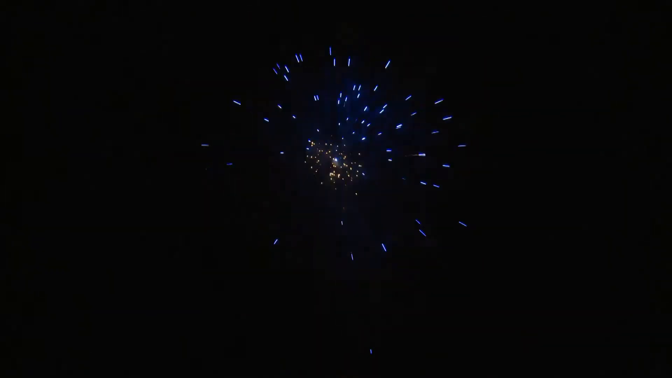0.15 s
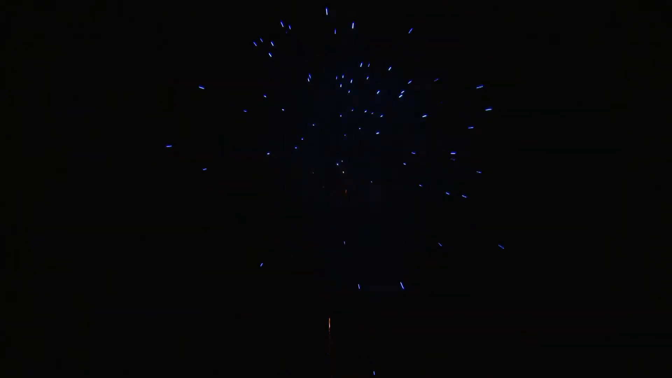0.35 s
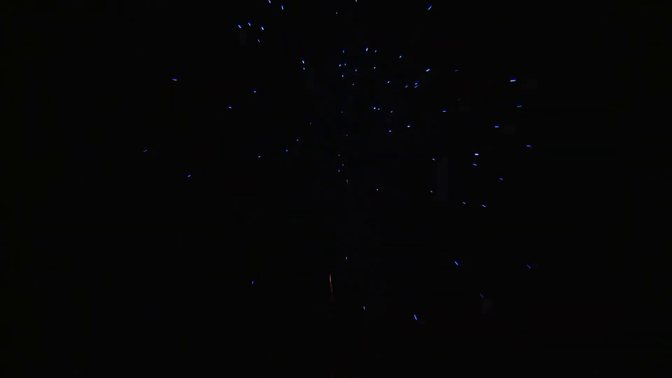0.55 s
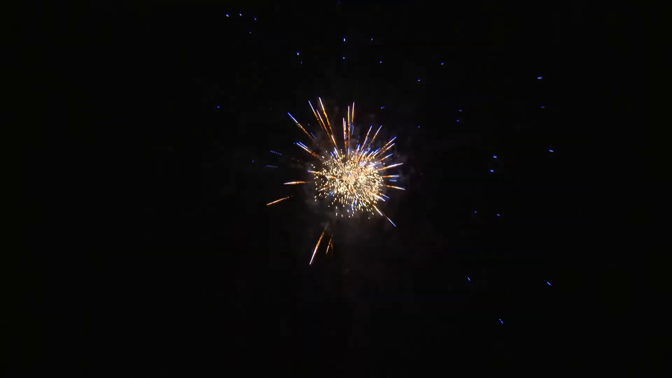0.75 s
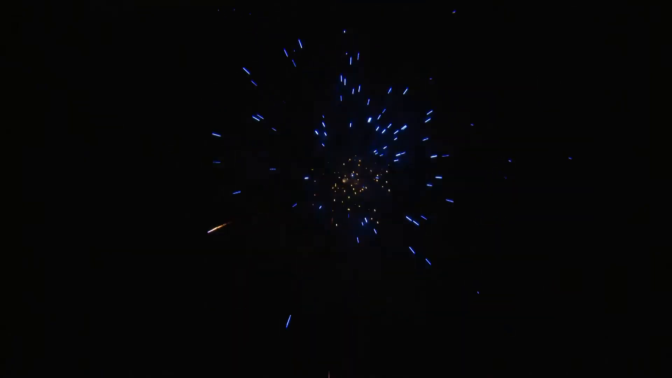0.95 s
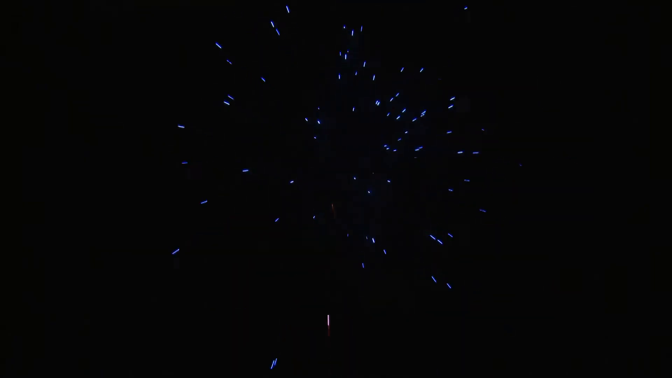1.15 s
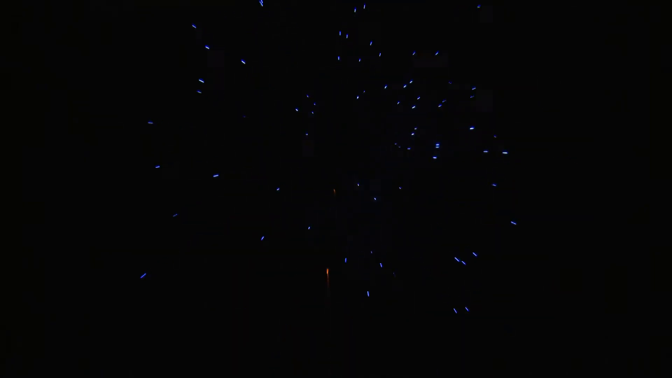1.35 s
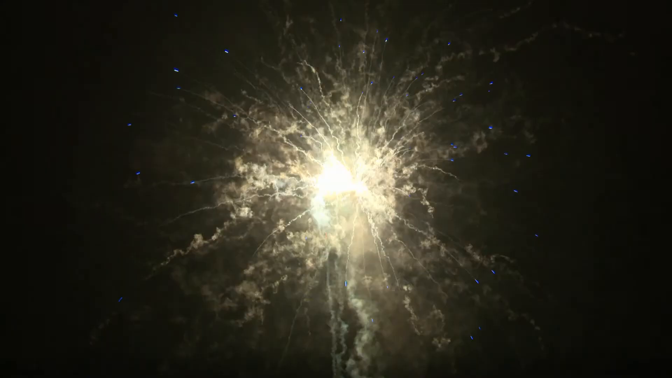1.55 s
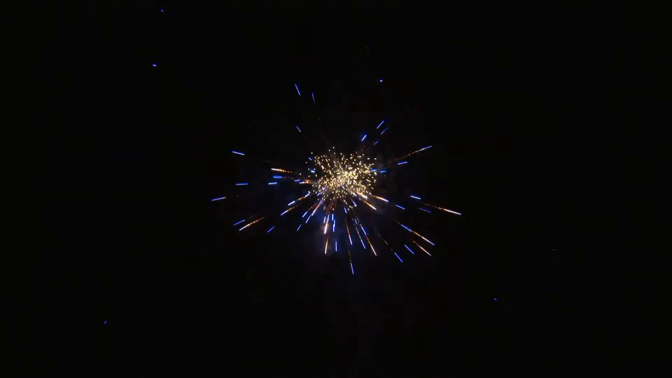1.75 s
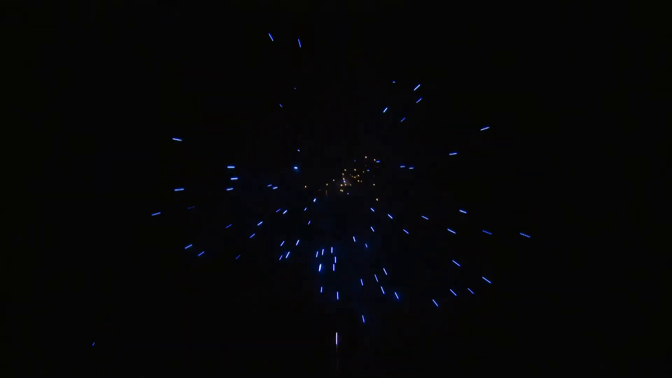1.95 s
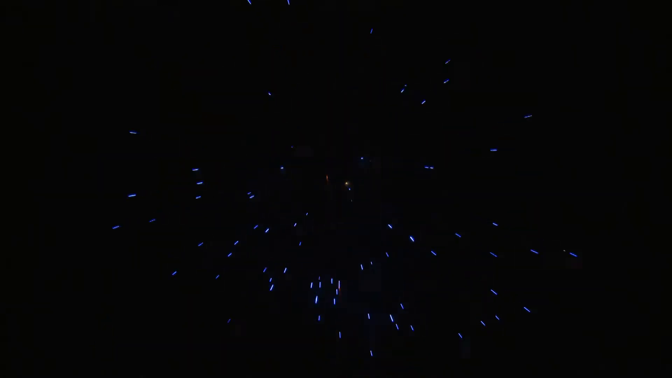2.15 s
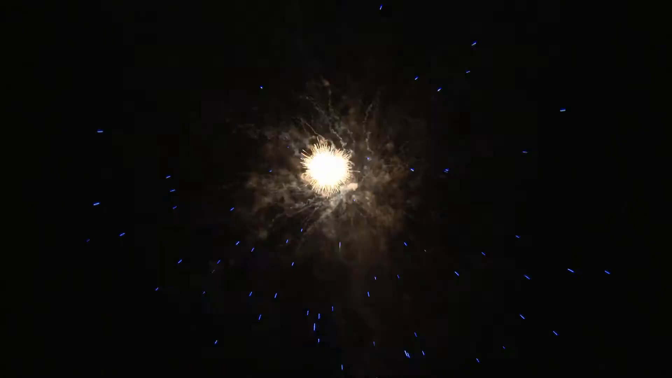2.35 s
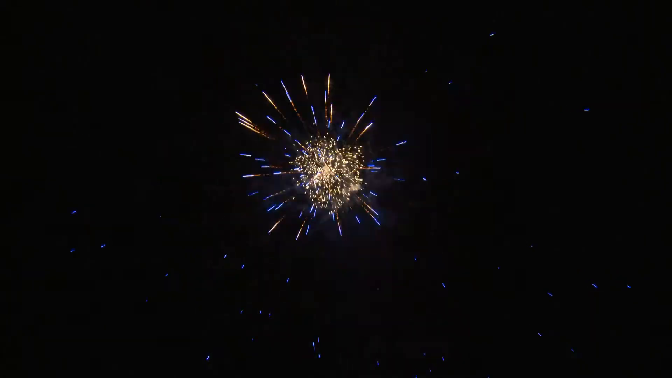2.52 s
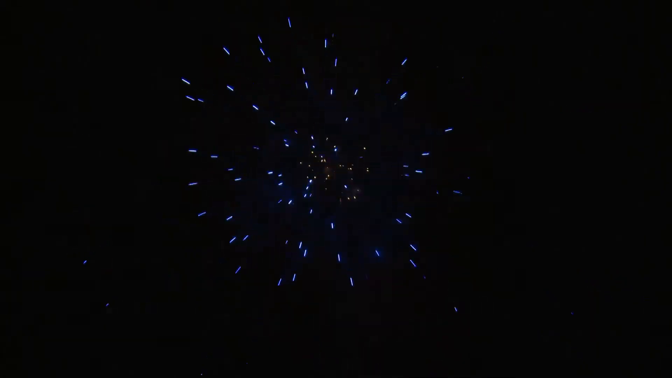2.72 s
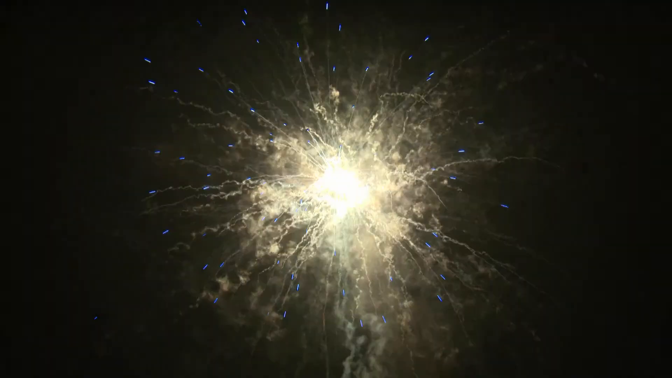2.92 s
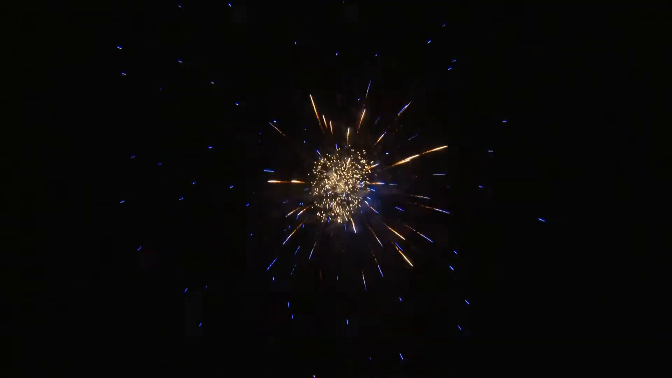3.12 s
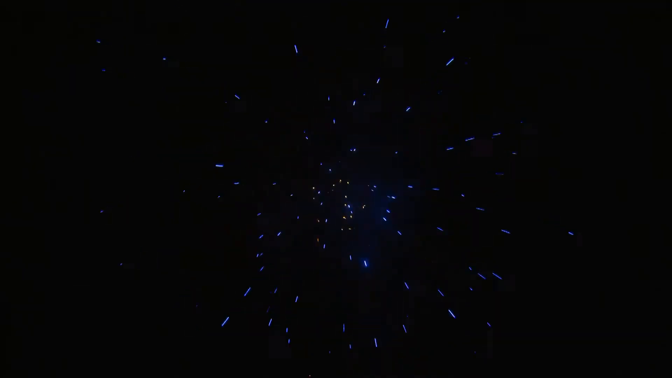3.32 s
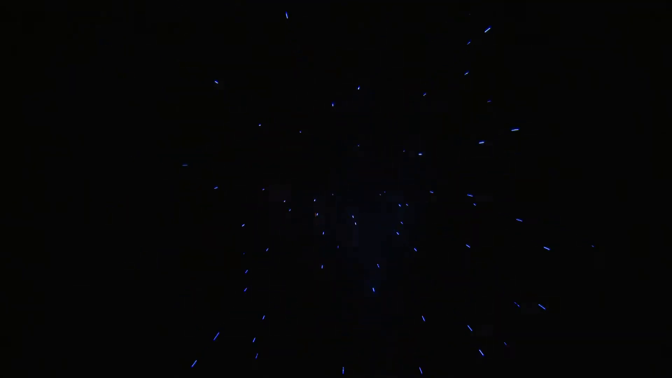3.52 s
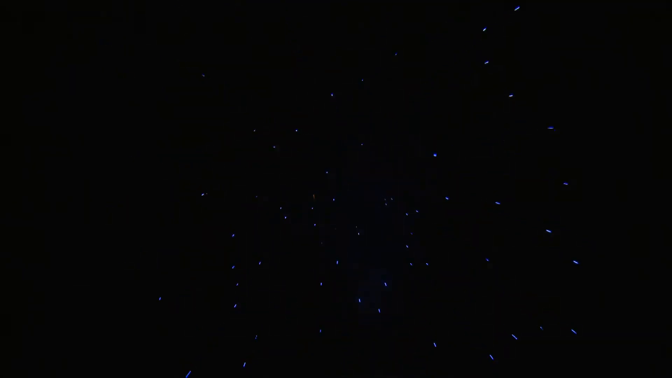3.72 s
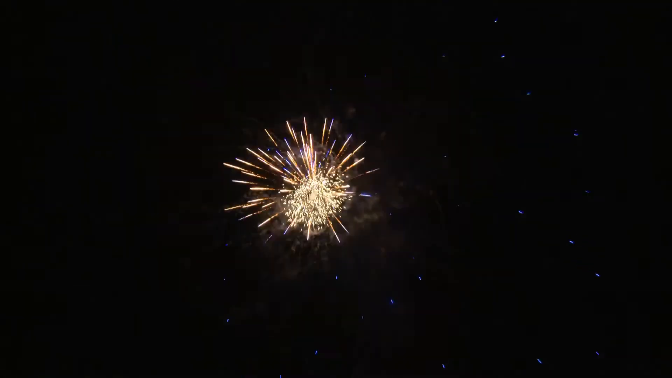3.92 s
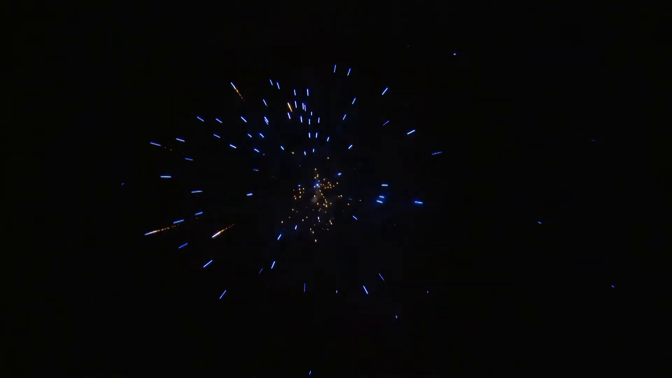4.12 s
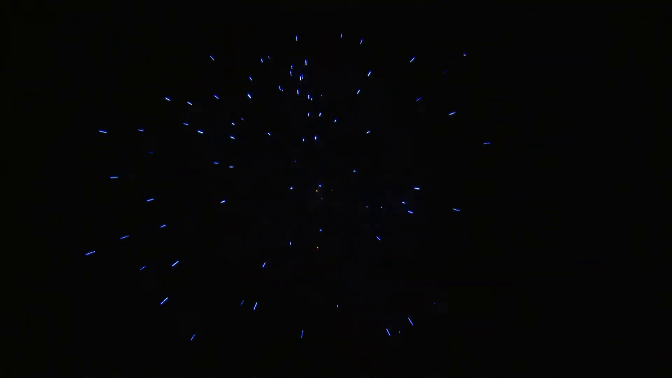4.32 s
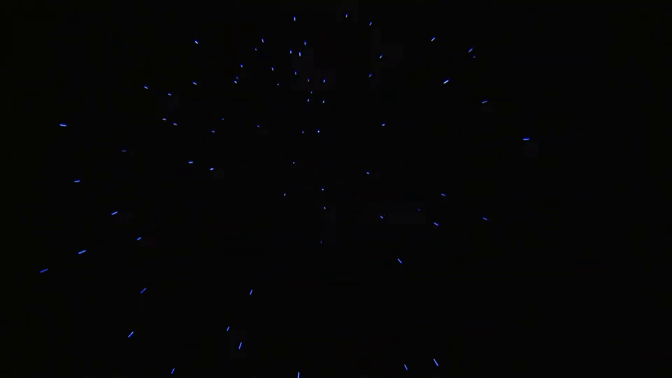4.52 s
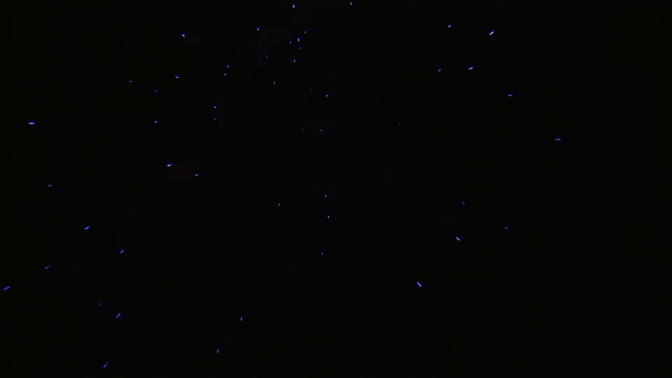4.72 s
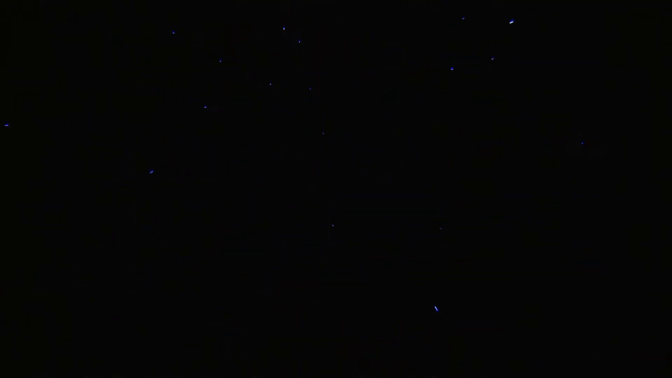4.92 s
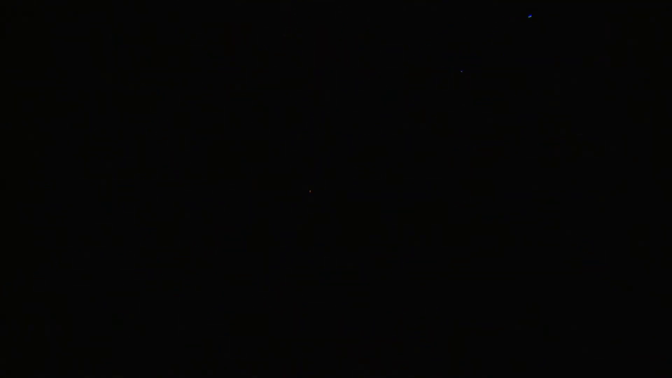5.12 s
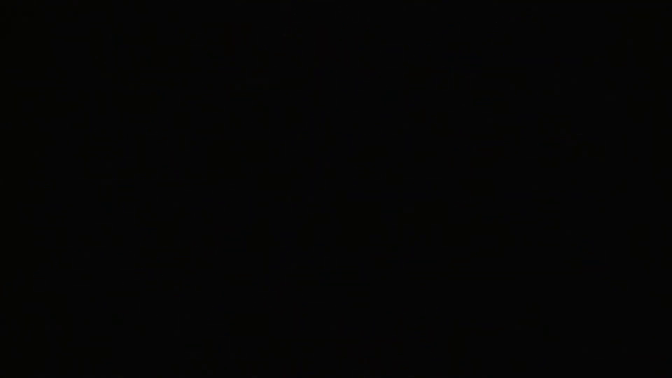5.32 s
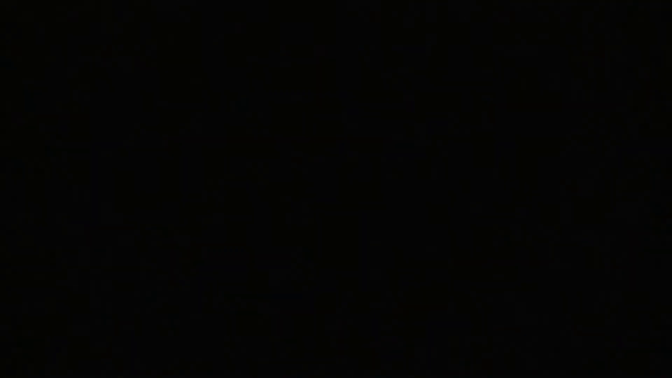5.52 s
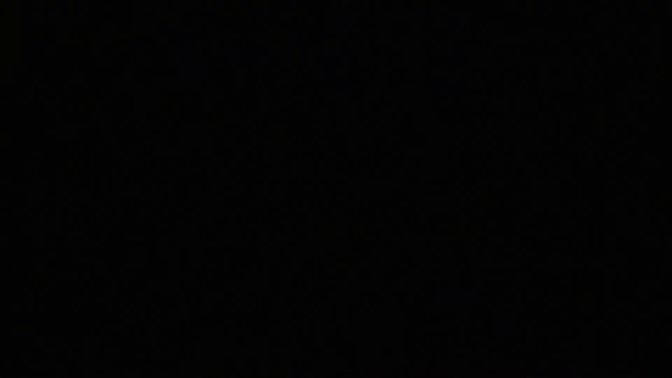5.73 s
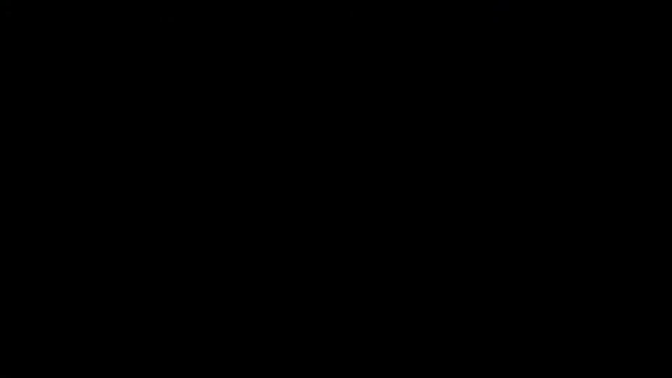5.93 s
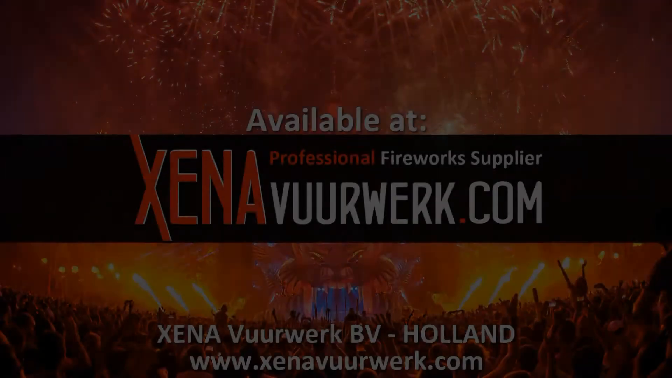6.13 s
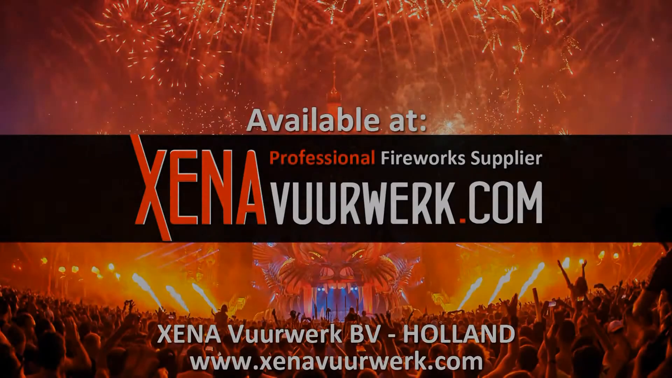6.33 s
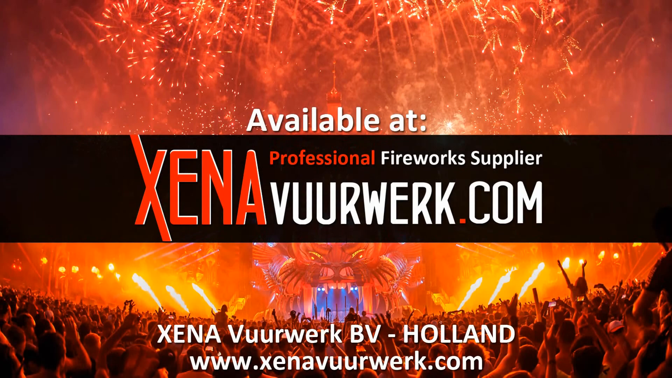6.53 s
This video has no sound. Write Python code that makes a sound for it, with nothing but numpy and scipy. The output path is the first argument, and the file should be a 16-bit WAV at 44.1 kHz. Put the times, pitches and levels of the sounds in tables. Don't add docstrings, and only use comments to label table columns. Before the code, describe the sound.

Rumble from earlier shots is already rolling when a sharp firework bang hits almost at once. Five more follow, under a second apart, slightly quickening for the fifth. Duller launch thumps precede some of them. Every bang is dry and short up close, overloading the nearby microphone, then answered by scattered slaps, low knocks and a lumpy rumble across open land. The last echoes die away and are faded out.

```python
import sys
import numpy as np
from scipy import signal
from scipy.io import wavfile
from scipy.ndimage import map_coordinates

SR = 44100
rng = np.random.default_rng(int(sys.argv[2]) if len(sys.argv) > 2 else 0)


def unload_audio(sound):
    columns = np.transpose(np.atleast_2d(sound))
    steps = np.round(np.clip(columns, -1, 1) * 32767)
    wavfile.write(sys.argv[1], SR, steps.astype(np.int16))


def ratio(d):
    e = np.asarray(d, float) / 20
    return 10 ** e


N = 289737

# start in seconds, peak in dB, lag of the right port in ms,
# gain of the right port during the shock in dB, tail in dB.
BURSTS = [
    (0.1038, -2.6, 0.47, -28, 4.45),
    (0.8826, .1, 0.24, -2, 1.8),
    (1.7998, 0.9, 0.21, -3.5, 1.7),
    (2.586, -0.36, 0.34, -1.2, 3.26),
    (3.185, -0.4, .4, -3.5, 3.3),
    (4.031, -1.8, 0.43, -3.5, 3.8),
]
# start in seconds, peak in dB, spit of gas in dB.
LIFTS = [
    (0.706, -13, -4.5),
    (1.559, -13, -1.5),
    (2.429, -12.5, -2),
]
# delay in ms, size, swing in Hz, T60 in ms.
BURST_PATHS = [(0, -.45, 260, 26), (3, 5, 166, 13), (4, -.4, 55, 70), (7.6, -1.2, 185, 22),
               (9.8, .35, 420, 30), (11.8, .65, 260, 17), (16.2, .2, 330, 20), (27.4, .2, 230, 50)]
# delay in ms, size, swing in Hz, T60 in ms.
LIFT_PATHS = [(0, .24, 200, 20), (1.5, -.1, 75, 50), (3.9, -.42, 190, 18), (6.9, .5, 165, 19),
              (15.5, -.2, 260, 26), (21.5, .05, 150, 90)]
# delay in seconds, strength in dB.
ROLL = [(.05, -13), (.18, 0.5), (.45, -1.9), (.7, -4), (.95, -8), (1.02, 3), (1.3, -0.5), (1.7, -5.5),
        (2.7, -13)]
# frequency in Hz, density in dB per Hz.
RUMBLE = [(15, -33), (25, -11), (59, -5), (87, -1.5), (135, 11), (260, -21), (340, -38), (570, -120)]
BODY = [(150, -29), (260, 2.5), (382, -5.5), (443, -1.5), (657, -5), (876, -11), (1190, -4.5),
        (1550, -14.5), (1800, -23.5), (2300, -33.5), (3000, -84)]
HISS = [(1240, -32), (2100, -4.5), (3580, -5.5), (5400, -9), (6000, -15), (14500, -27), (15300, -53)]
# frequency in Hz, density in dB per Hz.
CRACK = [(410, -35.5), (700, 6.5), (1960, -13.5), (3380, -26.5), (3700, -13), (5360, -25), (7660, -22),
         (14600, -30), (16500, -44.5)]
SCATTER = [(24, -30.5), (40, -6.5), (141, 6.5), (547, -4), (882, -17), (1390, -13), (1700, -27.5),
           (3260, -33), (4400, -27), (6590, -33), (8910, -38), (12000, -44.5), (15700, -47), (16000, -79)]
# frequency in Hz, density in dB per Hz.
SPIT = [(290, -33), (500, -10), (1520, -12.5), (2040, -18.5), (5430, -16.5), (10300, -24), (14900, -47),
        (16500, -53)]
# frequency in Hz, T60 in seconds.
NEAR_T60 = [(60, 0.39), (160, 0.075), (420, 0.21), (800, 0.18), (1300, 0.2), (3000, 0.14), (8000, 0.18),
            (12000, 0.21), (16000, .13)]
FAR_T60 = [(60, 1), (300, 0.64), (1100, 0.42), (3000, 0.59), (6000, 0.52), (9000, 0.74), (12000, 0.31),
           (16000, .4)]
# frequency in Hz, level in dB.
FAR_DB = [(60, -20.5), (300, -21), (1100, -17), (4000, -16), (10000, -17), (16000, -8.5)]
# frequency in Hz, level in dB.
SIDE_DB = [(60, -30.5), (300, -12.5), (700, -24), (1200, -39.5), (3000, -28.5), (8000, -35)]
FADE = (5.28, 6.073)
# frequency in Hz, density in dB per Hz.
GLINT = [(1240, -35.5), (2100, 0), (2360, -8.5), (3760, -7), (4910, -3), (5890, -12), (10000, -25.5),
         (13000, -59), (22000, -120)]
# start in seconds, peak in dB, lowest frequency in Hz, length in seconds.
TICKS = [
    (4.443, -69, 5950, 0.0035),
    (4.571, -78, 9000, .004),
    (4.62, -74, 8500, .004),
    (4.731, -78, 6500, 0.0038),
    (5.324, -81, 5000, 0.026),
    (5.813, -73, 5000, 0.019),
]
# frequency in Hz, density in dB per Hz.
SELF_NOISE = [(200, -4), (14800, -2.5), (15200, -42)]
# frequency in Hz, density in dB per Hz.
RATTLE = [(410, -28.5), (700, 0.5), (898, -3), (1480, -3.5), (1970, -13), (3890, -18.5), (7590, -25),
          (8760, -26.5), (16000, -38.5)]
# extra delay in ms, echo in dB, boom in dB, roll in dB.
SHELL_PLACES = [
    (-0.5, -2.5, 1.5, -0.3),
    (2.5, -0.7, -0.6, 0.94),
    (2, -1.4, 2.3, -1),
    (1, -1.4, 1.9, 0.46),
    (3, -0.9, 1.2, -1),
    (3, -0.9, 1, -0.1),
]
# start in seconds, roll in dB.
EARLIER = [
    (-1.9, 6.54),
    (-1.55, 3.6),
]
# delay after a burst in seconds, slap peak in dB, boom, hiss and edge in dB.
WALLS = [
    (.370, -26.5, -23, -33, -28),
    (.515, -21.5, -1.5, -35, -6.5),
    (.604, -23, -12.5, -33.5, -6.5),
    (.830, -42, -3.5, -21, -9),
    (.994, -40, -3, -31, 4),
    (1.298, -40.5, -7.5, -34.5, 1),
    (1.349, -42, -12.5, -32.5, -9),
]
# delay after a burst in seconds, peak in dB, pitch in Hz, T60 in seconds.
OBJECTS = [
    (.388, -23, 72.5, 0.053),
    (.616, -30, 119, .065),
    (.791, -25.5, 99.1, .075),
    (1.083, -36, 1370, 0.017),
    (2.0945, -22.5, 1305, 0.012),
]
# level in dB, loss in the air in dB per second, lumps in dB,
# share of the swings followed.
ROLL_LAYERS = [
    (-45, 2.25, 2, .9),
    (-52.5, 1, 2.43, 1),
    (-70.5, 4, 0.7, 0.78),
]
# delay in ms, size, swing in Hz, T60 in ms.
EDGE = [(4.2, -0.92, 982, 16), (5.6, 0.8, 621, 16)]


def along(points, hz):
    f, v = np.transpose(points)
    return np.interp(np.log(hz + 1), np.log(f + 1), v)


def ramp(t, start, length):
    return np.clip((t - start) / length, 0, 1)


def coloured(spectrum, size, decay=lambda hz, t: 0 * t, wide_db=0):
    hz, t, z = signal.stft(rng.standard_normal((2, size + 1024)), SR, nperseg=512)
    gain = ratio(along(spectrum, hz))[:, None]
    z = z * gain / np.sqrt(np.mean(gain ** 2))
    z = z * ratio(decay(hz[:, None], t))
    z[1] *= np.minimum(ratio(along(SIDE_DB, hz) + wide_db), 1)[:, None]
    mid, side = signal.istft(z, SR, nperseg=512)[1][:, :size]
    return np.array([mid + side, mid - side])


def swings(paths, t, lead, front_ms, blur=0):
    wave = 0 * t
    for delay_ms, size, hz, t60_ms in paths:
        rise_ms = front_ms + blur * max(delay_ms - 3, 0)
        since = np.maximum(t - delay_ms / 1000, 0)
        front = 1 - np.exp(-since * 1000 / rise_ms)
        swing = np.cos(2 * np.pi * hz * since + lead)
        wave = wave + size * front * swing * ratio(-60000 * since / t60_ms)
    return wave


def add(out, s, sound):
    start = round(s * SR)
    out[:, start:start + sound.shape[1]] += sound[:, :out.shape[1] - start]


def returns(reflectors):
    arrivals = []
    for burst, (late_ms, echo_db, boom_db, _) in zip(BURSTS, SHELL_PLACES):
        for delay, *rest in reflectors:
            if burst[0] + delay < N / SR:
                arrivals.append((burst[0] + late_ms / 1000 + delay, echo_db, boom_db, rest))
    return arrivals


def roll():
    shots = np.array(EARLIER + [(burst[0], place[3]) for burst, place in zip(BURSTS, SHELL_PLACES)])
    t = np.arange(N) / SR
    coarse_t = np.arange(0, N / SR, .001)
    age = coarse_t - shots[:, :1]
    strength_db = np.interp(age, *np.transpose(ROLL))
    out = ratio(-94.5) * coloured(SELF_NOISE, N, wide_db=23.0)
    for (level_db, loss_db, lumps_db, swing), spectrum in zip(ROLL_LAYERS, [RUMBLE, BODY, HISS]):
        lumps = map_coordinates(rng.standard_normal(200), [t * 25])
        shot_db = swing * strength_db + shots[:, 1:] - loss_db * age
        power = (ratio(2 * shot_db) * (age > 0)).sum(axis=0)
        envelope = np.interp(t, coarse_t, np.sqrt(power))
        out += envelope * ratio(level_db + lumps_db * lumps) * coloured(spectrum, N)
    return out


def ticks():
    out, t = np.zeros((2, N)), np.arange(SR // 20) / SR
    for s, db, low_hz, length in TICKS:
        bright = [(low_hz * 0.82, -40), (low_hz, 0), (low_hz * 1.3, -12), (15500, -16), (16000, -60)]
        puff = ramp(t, 0, 0.0011) / (1 + (t / length) ** 6)
        add(out, s, ratio(db) * coloured(bright, len(t)) * puff)
    return out


def knocks():
    out, t = np.zeros((2, N)), np.arange(SR // 10) / SR
    for s, echo_db, _, (db, hz, t60) in returns(OBJECTS):
        envelope = ratio(db + echo_db - 60 * t / t60) * (1 - np.exp(-t / .003))
        add(out, s, envelope * np.sin(2 * np.pi * hz * t) * np.ones((2, 1)))
    return out


def echoes():
    out, t = np.zeros((2, N)), np.arange(SR // 7) / SR
    for s, echo_db, low_db, (db, boom_db, hiss_db, edge_db) in returns(WALLS):
        boom = swings([(0, -.7, 120, 30), (3.2, 1.1, 95, 45)], t, lead=-1.1, front_ms=.9)
        boom = ratio(boom_db + low_db + 5) * boom
        edge = ratio(edge_db) * swings(EDGE, t, lead=-0.71, front_ms=0.31)
        smear = ramp(t, .001, 0.0079) * (ratio(-60 * t / 0.017) + ratio(-3.5 - 60 * t / 0.12))
        slap = ratio(-5.0) * coloured(BODY, len(t)) * smear
        puff = (1 - np.exp(-t / 0.0014)) / (1 + (t / 0.024) ** 4)
        hiss = ratio(hiss_db - 5.5) * coloured(GLINT, len(t), wide_db=13.5) * puff
        add(out, s, ratio(db + echo_db) * (boom + edge + slap + hiss))
    return out


def lifts():
    out, t = np.zeros((2, N)), np.arange(SR // 4) / SR
    port_t = np.array([t, t - .00008])
    for s, db, spit_db in LIFTS:
        thump = swings(LIFT_PATHS, port_t, lead=-.8, front_ms=.4)
        jet = ratio(-49) * ramp(t, .002, 0.003) / (1 + (t / 0.023) ** 6)
        first_spit = ratio(-30 - 60 * (t - .004) / 0.0025) * (t > .004)
        second_spit = ratio(-35 - 60 * (t - .013) / 0.042) * ramp(t, .0115, 0.0032)
        breath = ratio(-56 - 60 * t / 0.11) * ramp(t, 0, 0.0045) ** 2
        gas = (jet + first_spit + second_spit + breath) * coloured(SPIT, len(t), wide_db=20.0)
        after = ratio(-35.0 - 60 * t / 0.23) * ramp(t, 0, 0.012) * coloured(SCATTER, len(t))
        add(out, s, ratio(db + 14) * (thump + ratio(spit_db) * gas + after))
    return out


def tail_decay(hz, s):
    near = ratio(-120 * s / along(NEAR_T60, hz))
    far = ratio(2 * along(FAR_DB, hz) - 120 * s / along(FAR_T60, hz))
    return 10 * np.log10(near + far)


def bursts():
    size = 3 * SR // 4
    out, t = np.zeros((2, N)), np.arange(size) / SR
    right_only = np.array([[0], [1]])
    ground = coloured(SCATTER, size, tail_decay)
    swell = np.sin(np.pi * ramp(t, .011, .017) ** 1.6)
    flutter = .3 * swell * np.cos(2 * np.pi * 435 * (t - .0251))
    shock = 1 - ramp(t, .0149, 0.0011)
    drop = np.exp(-((t - .0045) / .0015) ** 2)
    bite = ratio(-26.5 - 60 * t / 0.01) + ratio(-3.5 - 60 * np.abs(t - .004) / 0.0067)
    rattle = ratio(-19.5) * ramp(t, .006, 0.0045) / (1 + (t / 0.021) ** 5)
    snap = -.8 * (t > .0043) * np.exp(-np.abs(t - .0043) / 0.001) * right_only
    for s, db, lag_ms, right_db, tail_db in BURSTS:
        port_t = np.array([t, t - drop * lag_ms / 1000])
        blast = swings(BURST_PATHS, port_t, lead=.65, front_ms=.05, blur=.03)
        scatter = .9 * ground + .45 * coloured(SCATTER, size, tail_decay)
        tail = ratio(tail_db - 9) * scatter * ramp(t, .019, .013)
        crack = coloured(CRACK, size, wide_db=36.5) * bite
        crack += coloured(RATTLE, size, wide_db=22.5) * rattle
        loaded = (blast + flutter + tail) * ratio(shock * right_only * right_db)
        add(out, s, ratio(db) * (loaded + crack + snap))
    return out


def scene():
    return roll() + ticks() + knocks() + echoes() + lifts() + bursts()


def top_cut(x):
    return signal.sosfilt(signal.butter(12, 16790, fs=SR, output="sos"), x)


def record(dry):
    bass_cut = signal.sosfilt(signal.butter(1, 22, "high", fs=SR, output="sos"), dry)
    clipped = .985 * bass_cut / (1 + np.abs(bass_cut) ** 12) ** (1 / 12)
    limited = signal.sosfiltfilt(signal.butter(18, 16300, fs=SR, output="sos"), clipped)
    fade = 1 - ramp(np.arange(N) / SR, FADE[0], FADE[1] - FADE[0])
    return top_cut(limited * fade)


dry = scene()
out = record(dry)
unload_audio(out)
```